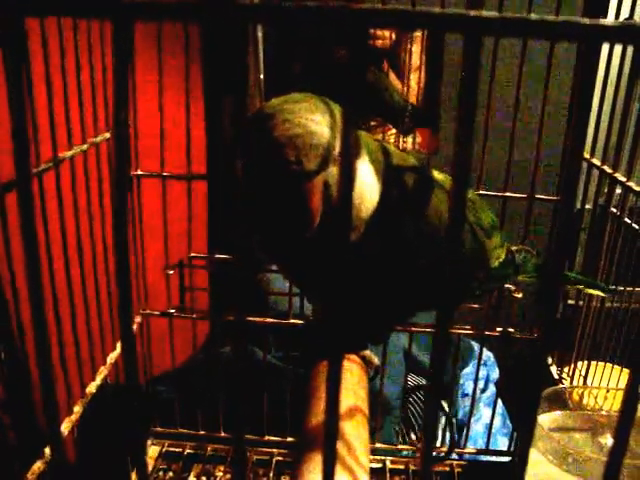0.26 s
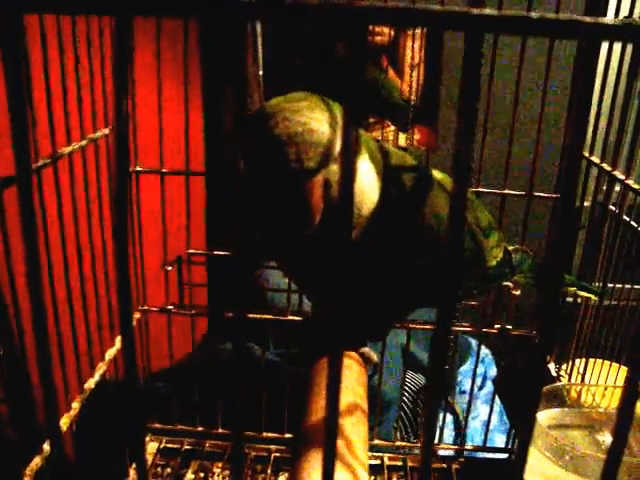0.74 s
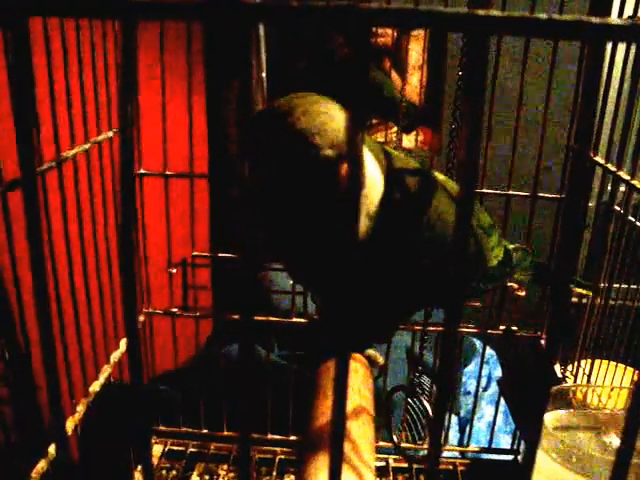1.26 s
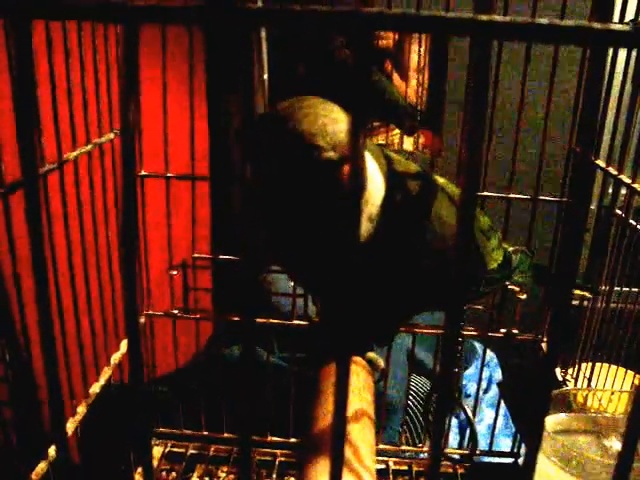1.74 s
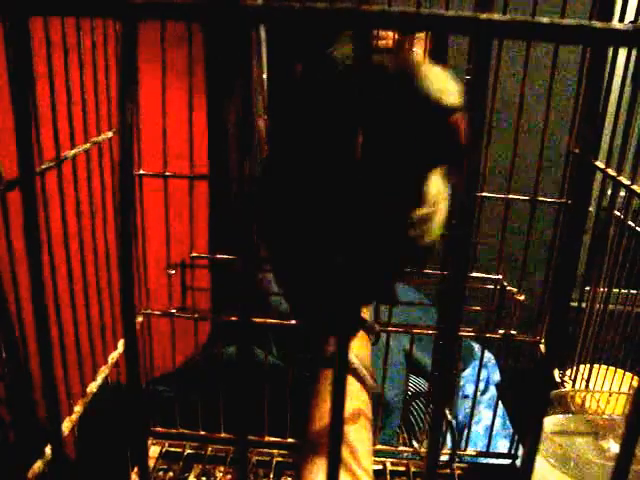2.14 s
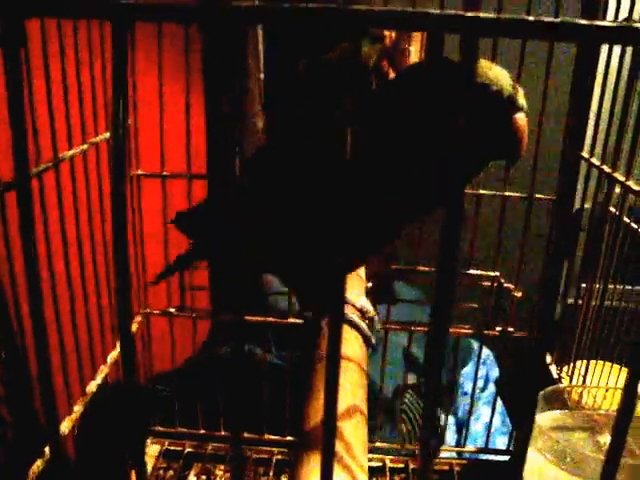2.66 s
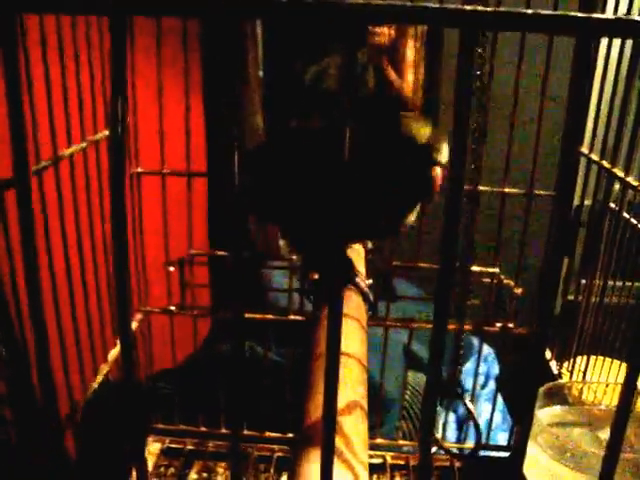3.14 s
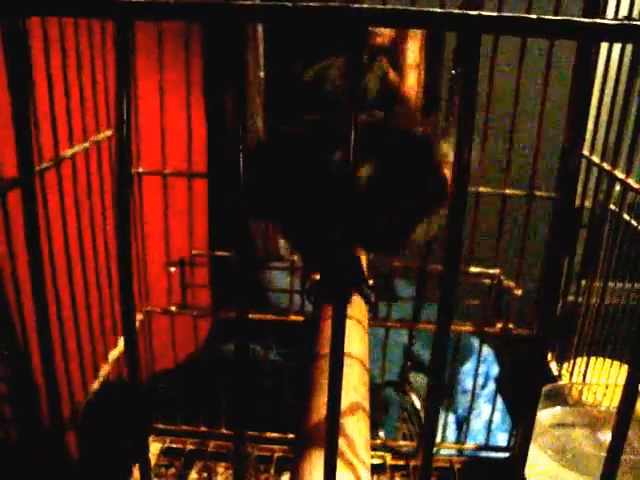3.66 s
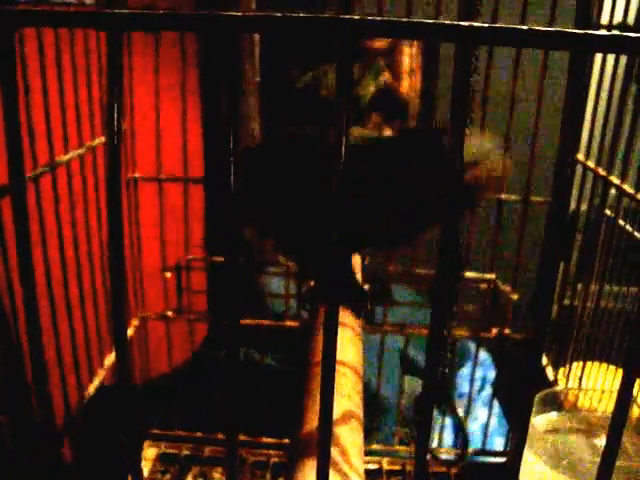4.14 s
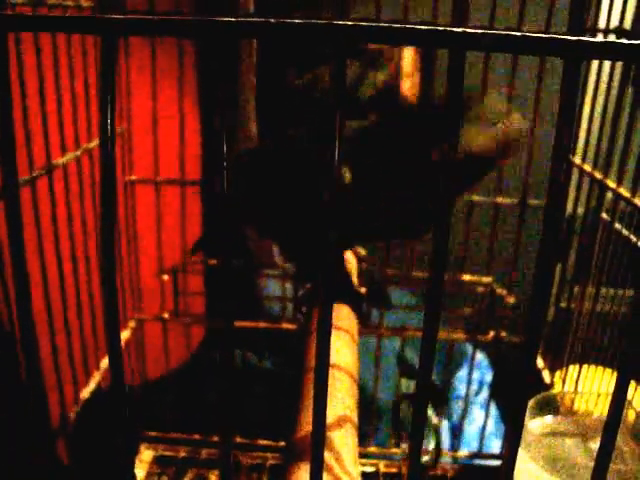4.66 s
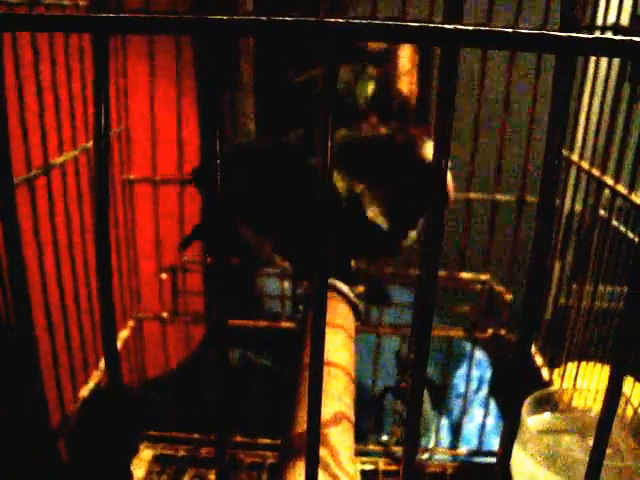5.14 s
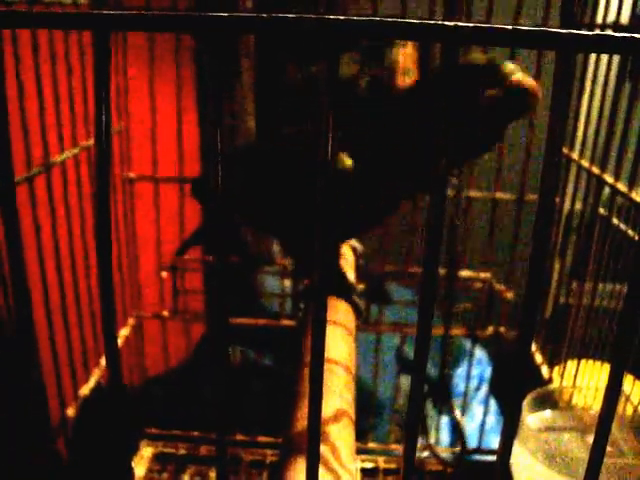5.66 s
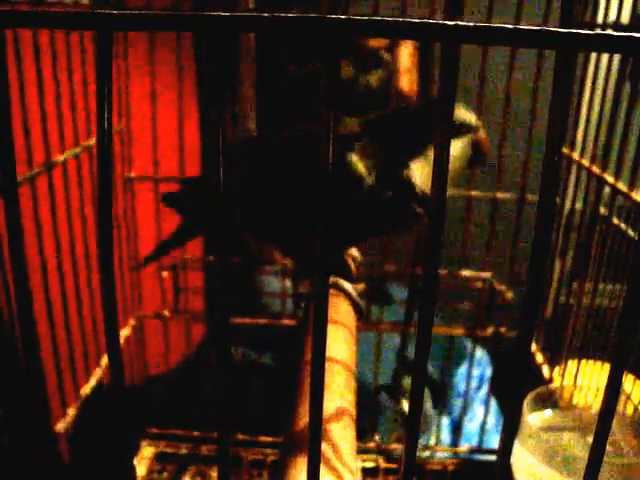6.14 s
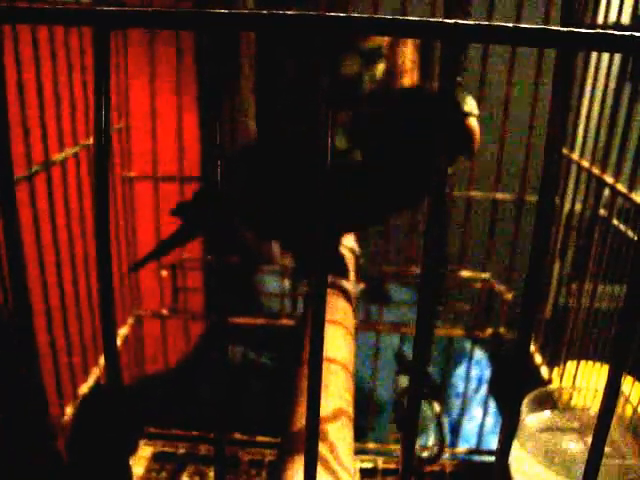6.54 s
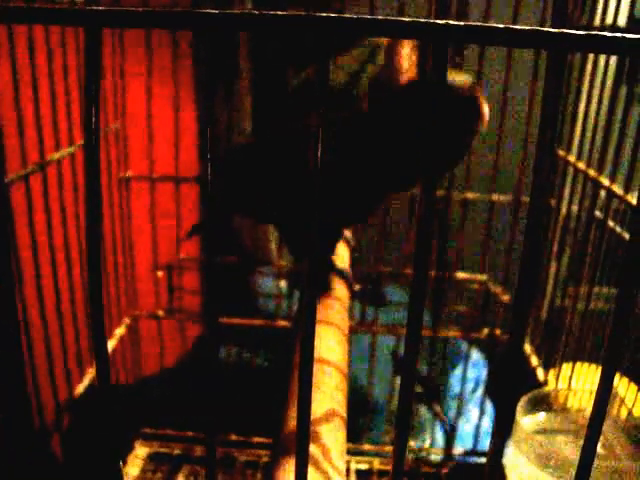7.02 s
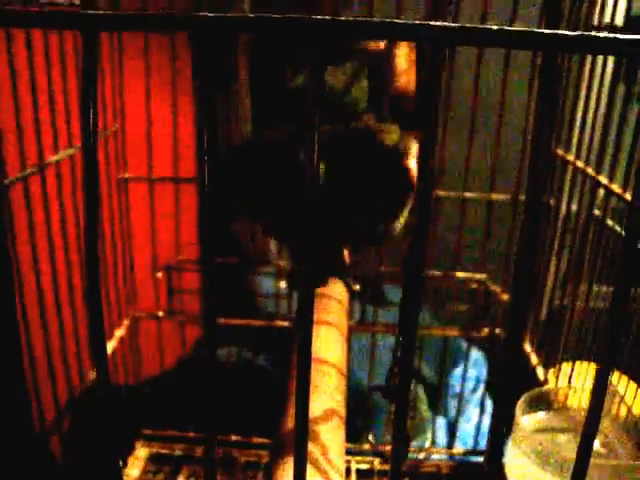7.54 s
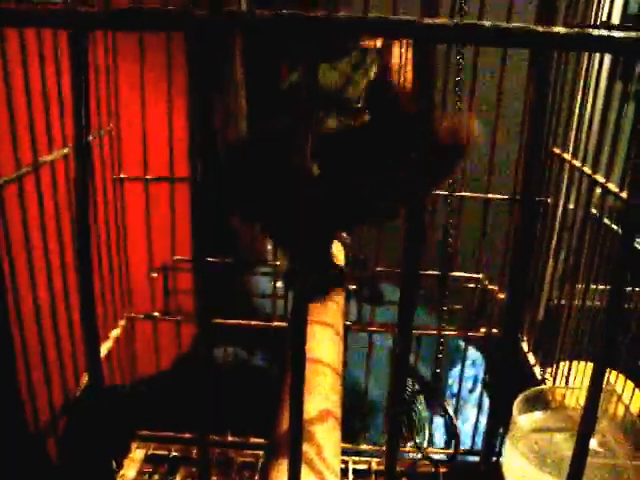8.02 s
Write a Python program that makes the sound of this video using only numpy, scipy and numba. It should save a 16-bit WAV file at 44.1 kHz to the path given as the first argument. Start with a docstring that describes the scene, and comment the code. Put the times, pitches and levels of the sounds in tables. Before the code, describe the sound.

A parakeet chatters without pause in a wire cage, giving short, raspy, high chirps that sweep up and down in quick succession. It draws out a longer falling note once at the start and three more times from the middle on. Beak and claws tick now and then, and a foot softly knocks the perch. The bird sounds close, in a small, live room with faint steady noise.

```python
"""A small, live room: a parakeet chatters in a wire cage, about seven calls a second.
Its voice is a rough buzz from the syrinx through one sharp throat resonance, which sweeps down and up
in turn; four times it draws out a long falling note. Soft slurs lead into the rises that start low.
Beak and claws tick now and then and a foot knocks the perch, over faint room noise."""
import sys
import numpy as np
from scipy import signal
from scipy.fft import rfft, irfft
from scipy.io import wavfile
from scipy.ndimage import uniform_filter1d
from numba import njit

SR = 44100
rng = np.random.default_rng(int(sys.argv[2]) if len(sys.argv) > 2 else 0)


def file_out(sig):
    """Save sig as 16-bit WAV at sys.argv[1]."""
    # one column per channel
    cols = np.atleast_2d(sig).T
    # limit, then scale
    lim = np.clip(cols, -1, 1)
    pcm = np.round(lim * 32767).astype(np.int16)
    wavfile.write(sys.argv[1], SR, pcm)


N = 365588
TIME = np.arange(N) / SR


def from_db(db):
    return 10 ** (np.asarray(db) / 20)


def unit_rms(x):
    return x / np.sqrt(np.mean(x ** 2) + 1e-20)


def at_hz(table, hz):
    """Reads (Hz, value) rows on a log-frequency axis."""
    table_hz, values = np.array(table).T
    return np.interp(np.log(hz + 1e-9), np.log(table_hz), values)


def butter(x, hz, kind, order=2):
    return signal.sosfilt(signal.butter(order, hz, kind, fs=SR, output="sos"), x)


def hold_level(x, window_samples=380):
    """Holds the running RMS at 1; single pulses still stand out."""
    return x / np.sqrt(np.abs(uniform_filter1d(x * x, window_samples)) + 1e-12)


def impulses(table):
    """One impulse per (s, dB) row."""
    out = np.full(N, 1e-18)
    for start_s, db in table:
        out[int(start_s * SR)] += from_db(db)
    return out


def gate(start_s, end_s, attack_s, release_s):
    """Linear attack, exponential release after the end; returns sample span and gain."""
    span = slice(int(max(start_s, 0) * SR), int((end_s + 10 * release_s) * SR))
    t = TIME[span]
    return span, np.clip((t - start_s) / attack_s, 0, 1) * np.exp(-np.maximum(t - end_s, 0) / release_s)


def resonances(x, table):
    """Fixed resonances in parallel, signs alternating."""
    out = 0
    for k, (hz, width_hz, db) in enumerate(table):
        r = np.exp(-np.pi * width_hz / SR)
        poles = [1, -2 * r * np.cos(2 * np.pi * hz / SR), r * r]
        out = out + (-1) ** k * from_db(db) * (1 - r * r) / 2 * signal.lfilter([1, 0, -1], poles, x)
    return out


@njit
def sweep(x, hz, width_hz):
    """One resonance with moving centre and width."""
    out, state = np.zeros(len(x)), 0j
    for i in range(len(x)):
        state = state * np.exp(np.pi * (2j * hz[i] - width_hz[i]) / SR) + x[i]
        out[i] = state.real
    return out


def formant(x, hz, width_hz, skirt_hz):
    """A sharp moving peak inside a wider one that steepens its flanks; level 1."""
    peak = sweep(x, hz, width_hz * np.ones(N))
    return hold_level(sweep(peak, hz, skirt_hz * np.ones(N)))


# Room noise spectrum. Each row: frequency in Hz, relative density in dB.
NOISE_SPECTRUM = [(25, -27), (50, -18), (110, -9), (190, -2), (380, 0), (700, -2), (1400, -4), (3000, -9),
                  (5000, -12), (7500, -15), (10000, -16), (14000, -40)]


def room_noise(rms_db=-51.5):
    """Faint, steady, dull noise."""
    colour = from_db(at_hz(NOISE_SPECTRUM, np.arange(N // 2 + 1) * SR / N))
    return from_db(rms_db) * unit_rms(irfft(rfft(rng.standard_normal(N)) * colour, N))


# Reverb decay. Each row: frequency in Hz, T60 in seconds.
TAIL_T60 = [(200, 1.97), (1000, 0.7), (3300, 0.303), (6000, .5), (10000, 0)]
# Reverb colour. Each row: frequency in Hz, gain in dB.
TAIL_COLOUR = [(200, 3), (450, 3), (1000, 0.5), (2400, 1), (3200, 2), (3700, 0.5), (4150, -2.5),
               (5000, 2.5), (10000, -8.5)]


def room(x, tail_db=-6, early_db=-14, early_decay_s=.0048, wall_delay_s=.0022, wall_gain=.23):
    """A near wall, scattered early echoes from cage and furniture, a tail that dies band by band."""
    t = TIME[:int(SR * .7)]
    white, tail = rng.standard_normal((2, len(t))), 0
    edges_hz = np.geomspace(120, 12000, 11)
    for k, band in enumerate(zip(edges_hz, edges_hz[1:])):
        t60_s = at_hz(TAIL_T60, np.sqrt(band[0] * band[1]))
        tail = tail + butter(white[k % 2], band, "band") * from_db(-60 * t / t60_s)
    colour = from_db(at_hz(TAIL_COLOUR, np.fft.rfftfreq(len(t), 1 / SR)))
    tail = irfft(rfft(tail) * colour, len(t))
    tail = tail * np.clip(t / .0035, 0, 1) / np.sqrt(SR * .05)
    scatter = rng.standard_normal(len(t)) * (rng.random(len(t)) < .05)
    early = scatter * (t > .002) * np.exp(-t / early_decay_s)
    response = from_db(tail_db) * tail + from_db(early_db) * early / np.linalg.norm(early)
    response[0] += 1
    response[int(wall_delay_s * SR)] += wall_gain
    return signal.fftconvolve(x, response)[:N]


# Cage colour. Each row: centre in Hz, width in Hz, gain in dB.
CAGE_BANDS = [(1674, 197, 6), (2300, 340, 2.5), (2254, 67, 2.5), (3104, 87, 5), (3480, 280, 0),
              (5300, 620, 0.5), (1305, 170, 3), (2820, 140, -0.5)]


def cage(x):
    """Reflections round the cage lift some narrow bands and hollow others."""
    for hz, width_hz, db in CAGE_BANDS:
        x = x + (from_db(db) - 1) * resonances(x, [(hz, width_hz, 0)])
    return x


# Knocks on the perch. Each row: start in seconds, relative level in dB.
PERCH_KNOCKS = [(4.352, -54.5), (5.53, -51.5), (6.748, -42)]
# Modes of perch and cage frame. Each row: frequency in Hz, gain in dB, T60 in seconds.
PERCH_MODES = [(253, -10, 0.17), (389, 8.5, 0.067), (477, -8, 0.34), (562, -3, 0.17)]


def perch(scuff_decay_s=.0028):
    """A foot scuffs down and the perch rings dully."""
    t = TIME[:SR // 20]
    scuff = rng.standard_normal(len(t)) * np.exp(-t / scuff_decay_s)
    blows = signal.fftconvolve(impulses(PERCH_KNOCKS), scuff / np.linalg.norm(scuff))[:N]
    ring = 0
    for hz, db, t60_s in PERCH_MODES:
        r, w = from_db(-60 / (t60_s * SR)), 2 * np.pi * hz / SR
        ring = ring + from_db(db) * signal.lfilter([0, np.sin(w)], [1, -2 * r * np.cos(w), r * r], blows)
    return butter(ring, 160, "high", order=4)


# Beak and claw ticks. Each row: start in seconds, relative level in dB.
TICK_HITS = [(0.092, -14), (0.376, -10.5), (1.263, -16.5), (4.3075, -15), (4.434, -39), (5.518, -19),
             (5.632, -29.5), (6.6995, -14.5)]


def ticks(gain_db=12, crack_decay_s=.0031):
    """Hard, very short contacts excite a wide band."""
    t = TIME[:SR // 50]
    crack = rng.standard_normal(len(t)) * np.exp(-t / crack_decay_s)
    struck = signal.lfilter(crack / np.linalg.norm(crack), [1], impulses(TICK_HITS))
    return from_db(gain_db) * butter(struck, [900, 7000], "band", order=1)


# Rising chirps. Each row: start in seconds, length in seconds, first resonance in Hz, top in Hz,
# relative mid-call level in dB, fade over the call in dB, base rasp in dB.
RISING_CHIRPS = [(.002, 0.063, 3500, 3780, -40.5, 12, -15), (0.374, 0.042, 2750, 3470, -26.5, -1.5, -17),
                 (.527, 0.049, 3600, 3730, -25, -3, -15), (0.818, 0.039, 2500, 3500, -22, 6, -11.5),
                 (1.124, .024, 1900, 3280, -24, 3, -14), (1.156, .017, 3190, 4100, -33.5, 2, -6),
                 (1.316, 0.023, 3090, 3720, -33, -9, -18), (1.506, 0.038, 2260, 3320, -30.5, 13.5, -16),
                 (1.787, 0.045, 2670, 3712, -21.5, -3, -18), (2.079, 0.038, 2880, 3700, -22.5, 0.5, -16.5),
                 (2.256, .026, 2740, 3850, -28, -5, -14.5), (2.459, .032, 2360, 3400, -29.5, 6, -14),
                 (2.739, 0.028, 2650, 3530, -22, 3, -15), (3.034, 0.038, 1898, 3521, -35, 31, -22),
                 (3.296, 0.051, 1820, 3750, -26.5, 7.5, -18.5), (3.589, .031, 2011, 3300, -28, 6, -15.5),
                 (3.854, 0.036, 2050, 3517, -24, 0.5, -17.5), (4.31, .028, 2340, 3510, -26.5, 4, -25),
                 (4.459, 0.054, 3720, 3700, -28, 2, -10.5), (4.755, .058, 2750, 3920, -30, -2, -20.5),
                 (5.048, .034, 2031, 3590, -26, 3, -18), (5.951, .044, 2490, 3850, -28.5, 0, -16),
                 (6.249, .044, 3227, 3950, -22.5, 0, -16), (6.698, 0.039, 3246, 3700, -25.5, -2.5, -16),
                 (6.847, 0.044, 3470, 3780, -21.5, 3, -14.5), (7.154, .031, 2320, 3740, -26.5, 13, -11),
                 (7.435, .041, 2705, 3980, -29.5, 6, -14.5), (7.729, 0.043, 2120, 3422, -28, 7.5, -17),
                 (8.017, 0.041, 2042, 3600, -26.5, 0.5, -13.5)]


def rising_chirp(age_s, length_s, from_hz, top_hz, mid_db, fade_db, rasp_db, crest_share=.72):
    """The resonance climbs over an arch while the level swells and ebbs."""
    progress = np.minimum(age_s / length_s, 1)
    hz = top_hz - (top_hz - from_hz) * (1 - progress / crest_share) ** 2
    ebb_db = 4.5 * np.abs(2 * progress - 1)
    return hz, mid_db + fade_db * (.5 - progress) - ebb_db, rasp_db


def slurs(below_hz=2700, length_s=.031, glide_hz=(1020, 663), level_db=-47.5):
    """Before each rise from low down, the beak is nearly shut: a soft voice, a sinking resonance."""
    hz, level = np.full(N, 800.), np.zeros(N)
    for rise_s, _, from_hz, *_ in RISING_CHIRPS:
        if from_hz < below_hz:
            span, envelope = gate(rise_s - length_s, rise_s, attack_s=.0066, release_s=.0039)
            hz[span] = np.interp(TIME[span], [rise_s - length_s, rise_s], glide_hz)
            level[span] = envelope * from_db(level_db)
    return level * formant(rng.standard_normal(N), hz, width_hz=110, skirt_hz=850)


# Falling chirps. Each row: start in seconds, length in seconds, first resonance in Hz,
# relative mid-call level in dB, fade over the call in dB.
FALLING_CHIRPS = [(.687, 0.05, 3470, -24.5, 1), (.977, 0.038, 3540, -26, 10), (1.253, 0.024, 4130, -27, 10),
                  (1.377, 0.053, 3620, -28.5, 3), (1.648, .049, 3760, -23.5, 34),
                  (1.928, .035, 3990, -21, 20), (2.204, 0.024, 4198, -31, 14), (2.332, 0.037, 3170, -30, 3),
                  (2.602, 0.049, 3700, -24.5, 28), (2.89, 0.037, 3330, -26.5, 9.5),
                  (3.164, 0.038, 3540, -26.5, 15.5), (3.451, 0.038, 3590, -26, 13),
                  (3.72, 0.035, 3640, -24.5, 17), (4.616, 0.031, 3310, -27, 3.5),
                  (4.901, 0.03235, 3676, -25, 1), (5.8, 0.043, 3800, -22.5, 16),
                  (6.103, 0.034, 3886, -23.5, 7.5), (7.011, 0.035, 3630, -27.5, 14),
                  (7.291, 0.037, 3624, -27.5, 14), (7.584, 0.038, 3680, -24, 21),
                  (7.883, 0.039, 3550, -26, 13), (8.167, 0.034, 3900, -23, 22)]


def falling_chirp(age_s, length_s, from_hz, mid_db, fade_db, drop_octaves=.84, bow=1.86, rasp_db=-14):
    """The resonance drops ever faster while the level fades."""
    progress = np.minimum(age_s / length_s, 1)
    hz = from_hz * 2 ** (-drop_octaves * progress ** bow)
    return hz, mid_db + fade_db * (.5 - progress), rasp_db


# Long falling notes. Each row: start in seconds, length in seconds, first and last resonance in Hz,
# time to the break in seconds, relative levels in dB of opening, break, body, end and undertone.
DRAWN_NOTES = [(0.09, .19, 3530, 2215, 0.091, -12, -25.5, -24.5, -36, -32),
               (3.997, 0.19, 3850, 2248, 0.055, -21.5, -26.5, -22.5, -24.5, -21),
               (5.205, .175, 3893, 2240, 0.049, -20.5, -28, -24.5, -29, -18),
               (6.411, .19, 3850, 2700, 0.1, -24, -32, -26, -31.5, -16.5)]


def drawn_note(age_s, length_s, from_hz, to_hz, break_s, opening_db, break_db, body_db, end_db):
    """A glide that opens harsh and clears; at the break it sags and the undertone slips to the octave."""
    bow, swell_s, swell_db, slip_s = 1.11, .011, 2, .018
    hz = from_hz + (to_hz - from_hz) * np.minimum(age_s / length_s, 1) ** bow
    under_ratio = np.interp(age_s, [break_s, break_s + slip_s], [.62, .5])
    level_db = np.interp(age_s, [0, swell_s, break_s, (break_s + length_s) / 2, length_s],
                         [opening_db - swell_db, opening_db, break_db, body_db, end_db])
    rasp_db = -19 + 10.5 * np.exp(-age_s / .051)
    return hz, hz * under_ratio, level_db, rasp_db


def beak_opening(age_s, hz, rasp_db, opens_s, db_per_octave=15):
    """Rasp gain: the beak takes a moment to open and lets more out the higher the resonance stands."""
    return (1 - np.exp(-age_s / opens_s)) * from_db(rasp_db + db_per_octave * np.log2(hz / 3300))


# Manners of voice. Each: nominal pulse rate in Hz, base resonance width in Hz, throat and chest in dB.
FALLING = (480, 329, -12.5, -21.5)
RISING = (340, 410, -11.5, -17)
DRAWN = (480, 334.5, -14.5, -33)


def gestures(chirp_under_db=-24, full_voice_db=-19):
    """Per-sample voice controls: two resonances, three gains, age and manner of the call."""
    hz, under_hz = np.full(N, 3300.), np.full(N, 1600.)
    tone, rasp, under, age_s = np.zeros((4, N))
    manner = np.tile(np.array(FALLING, float), (N, 1))
    chirps = [(row, falling_chirp, FALLING) for row in FALLING_CHIRPS]
    chirps += [(row, rising_chirp, RISING) for row in RISING_CHIRPS]
    for (start_s, length_s, *row), shape, voice in sorted(chirps, key=lambda chirp: chirp[0]):
        span, envelope = gate(start_s, start_s + length_s, attack_s=.0022, release_s=.003)
        age_s[span], manner[span] = np.maximum(TIME[span] - start_s, 0), voice
        hz[span], level_db, rasp_db = shape(age_s[span], length_s, *row)
        tone[span] = envelope * from_db(level_db)
        rasp[span] = tone[span] * beak_opening(age_s[span], hz[span], rasp_db, opens_s=.0028)
        under_hz[span], under[span] = hz[span] / 2, tone[span] * from_db(chirp_under_db)
    for start_s, length_s, *row, under_db in DRAWN_NOTES:
        span, envelope = gate(start_s, start_s + length_s, attack_s=.0012, release_s=.0048)
        age_s[span], manner[span] = np.maximum(TIME[span] - start_s, 0), DRAWN
        hz[span], under_hz[span], level_db, rasp_db = drawn_note(age_s[span], length_s, *row)
        tone[span] = envelope * from_db(level_db)
        rasp[span] = tone[span] * beak_opening(age_s[span], hz[span], rasp_db, opens_s=.013)
        under[span] = tone[span] * from_db(under_db)
    # the voice cannot be pushed past full strength
    strain = (1 + (tone / from_db(full_voice_db)) ** 4) ** .25
    return hz, under_hz, tone / strain, rasp / strain, under / strain, age_s, manner.T


def syrinx(pulse_hz, jitter=.6, shimmer_db=3.5, air_db=-3):
    """The syrinx snaps open at uneven intervals with uneven force; air leaks through."""
    timing, force = rng.standard_normal((9000, 2)).T
    onsets = np.searchsorted(np.cumsum(pulse_hz) / SR, np.cumsum(np.exp(jitter * timing)))
    pulses = np.zeros(N)
    pulses[onsets[onsets < N]] = from_db(shimmer_db * force[onsets < N])
    air = from_db(air_db) * rng.standard_normal(N)
    return butter(unit_rms(pulses / np.sqrt(pulse_hz)) + air, 250, "high")


def first_snaps(snap_db=16, db_per_fade_db=.32, delay_s=.002):
    """Each chirp opens with a hard snap; harder for a falling chirp the more it fades."""
    falls = [(start_s + delay_s, snap_db + db_per_fade_db * fade_db)
             for start_s, *_, fade_db in FALLING_CHIRPS]
    rises = [(start_s + delay_s, snap_db) for start_s, *_ in RISING_CHIRPS]
    return impulses(falls + rises)


# Fixed resonances of chest, throat and open beak. Each row: centre in Hz, width in Hz, relative dB.
CHEST_BANDS = [(358, 56, -6), (562, 54, 6.5)]
THROAT_BANDS = [(571, 120, -4.5), (912, 280, -1.5), (1460, 282, 0), (1930, 810, 0)]
BEAK_BANDS = [(4200, 950, 4), (5430, 760, 8), (7260, 1090, 12.5), (9660, 950, 1.5)]


def parakeet(main_db=-1, beak_db=-4, upper_db=-4, sharpen_s=.025, throat_fade_s=.089, chest_fade_s=.047):
    """One buzz drives the sweeping resonance, a weak undertone, and chest, throat and beak."""
    hz, under_hz, tone_gain, rasp_gain, under_gain, age_s, manner = gestures()
    pulse_hz, base_width_hz, throat_db, chest_db = manner
    buzz = syrinx(pulse_hz) + first_snaps()
    # each call bursts out broad and clears as it goes on
    width_hz = base_width_hz * (.5 + np.exp(-age_s / sharpen_s))
    main = from_db(main_db) * formant(buzz, hz, width_hz, skirt_hz=2000)
    throat_gain = from_db(throat_db) * np.exp(-age_s / throat_fade_s)
    throat = throat_gain * hold_level(resonances(buzz, THROAT_BANDS))
    chest_gain = from_db(chest_db) * np.exp(-age_s / chest_fade_s)
    chest = chest_gain * hold_level(resonances(buzz, CHEST_BANDS))
    # the undertone beats with the main note and adds a faint line above it
    undertone = formant(buzz, under_hz, width_hz=70, skirt_hz=500)
    upper = formant(buzz, hz + under_hz, width_hz=250, skirt_hz=900)
    upper = from_db(upper_db) * butter(upper, 4800, "low", order=6)
    # air rushing past the tongue blurs the pulses in the treble
    hiss = buzz + from_db(2) * rng.standard_normal(N)
    beak = from_db(beak_db) * hold_level(butter(resonances(hiss, BEAK_BANDS), 5000, "high", order=3))
    return tone_gain * (main + throat + chest) + rasp_gain * beak + under_gain * (undertone + upper)


def scene():
    """Bird and perch sound through cage and room, over the room noise; mono."""
    near = cage(parakeet() + slurs() + ticks() + perch())
    return (room(near) + room_noise())[None]


def record(dry, ceiling=.38, cutoff_hz=10100):
    """Rounds the loudest peaks and cuts the top steeply."""
    rounded = dry / (1 + (dry / ceiling) ** 4) ** .25
    return signal.sosfilt(signal.ellip(10, .2, 70, cutoff_hz, fs=SR, output="sos"), rounded)


dry = scene()
out = record(dry)
file_out(out)
```